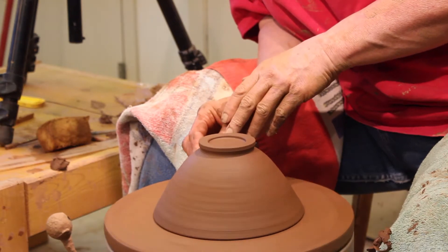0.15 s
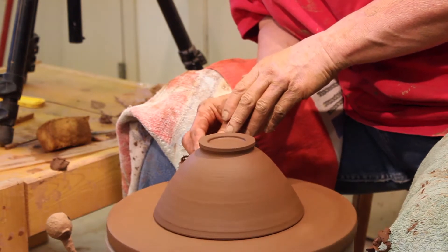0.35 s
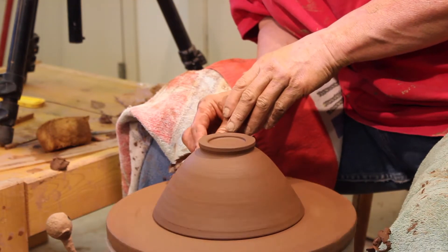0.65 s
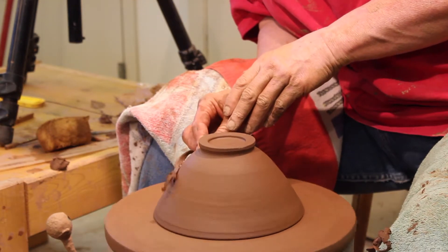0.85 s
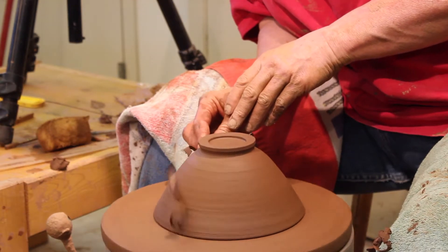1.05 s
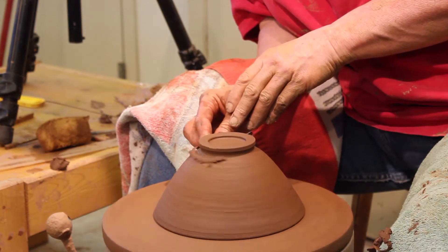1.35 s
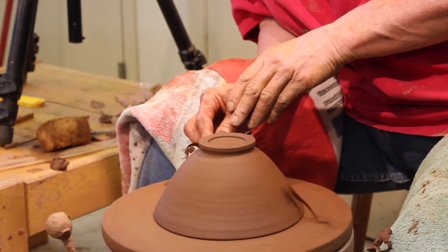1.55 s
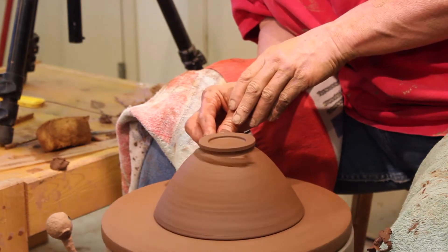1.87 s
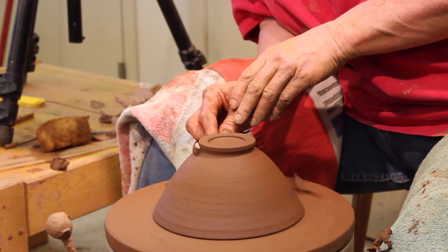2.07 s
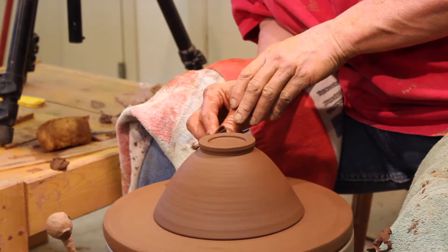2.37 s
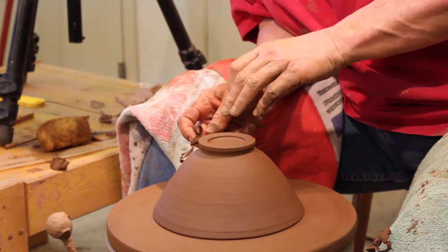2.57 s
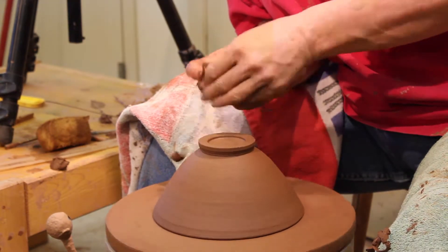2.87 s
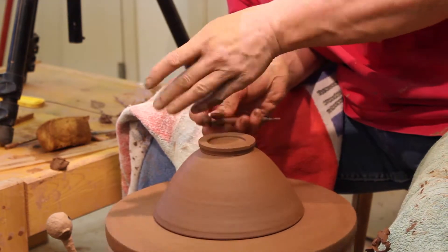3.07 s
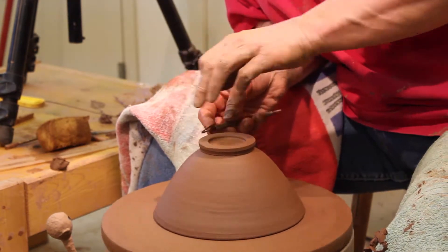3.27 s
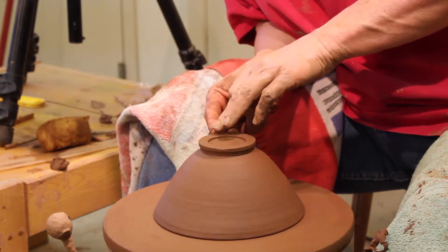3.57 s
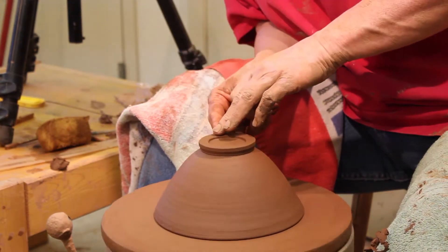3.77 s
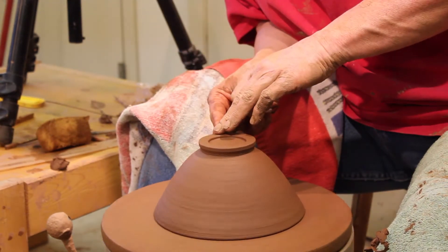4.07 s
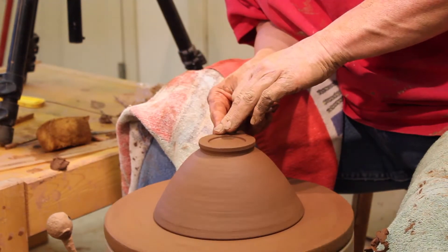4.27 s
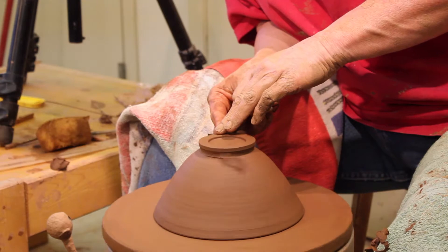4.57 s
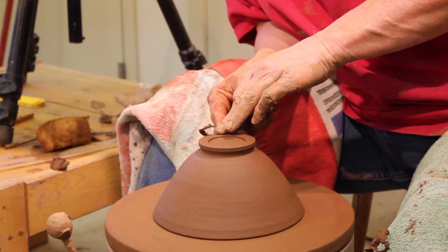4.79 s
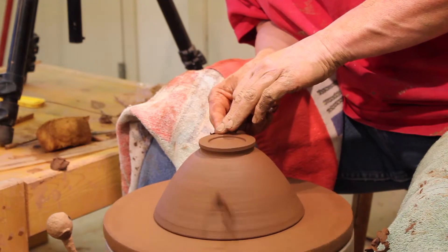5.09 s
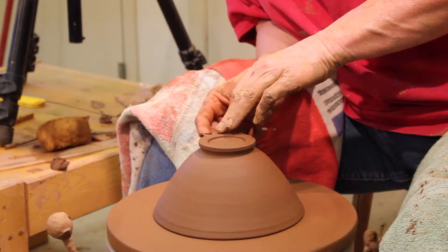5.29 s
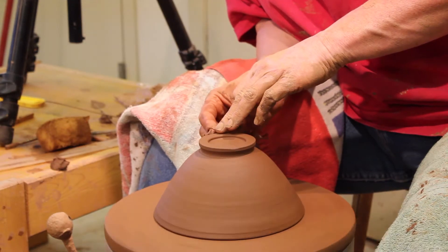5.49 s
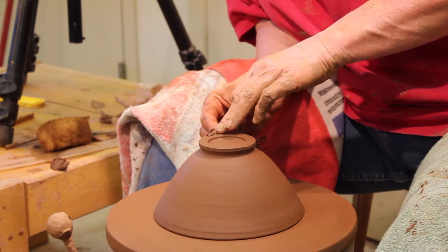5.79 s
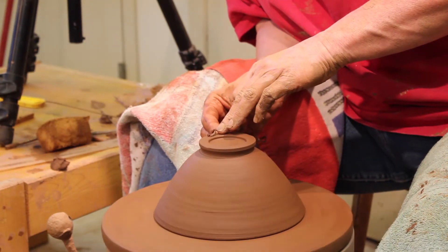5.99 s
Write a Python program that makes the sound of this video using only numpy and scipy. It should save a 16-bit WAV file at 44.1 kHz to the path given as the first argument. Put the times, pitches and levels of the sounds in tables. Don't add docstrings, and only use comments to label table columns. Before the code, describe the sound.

Steady low motor hum with a hollow knock recurring about every two-thirds second, soft clay-shaving hiss fading early, and a few tiny crumb clicks.

```python
import sys
import numpy as np
from scipy import signal
from scipy.fft import rfft, irfft, next_fast_len
from scipy.io import wavfile

SR = 44100
rng = np.random.default_rng(int(sys.argv[2]) if len(sys.argv) > 2 else 0)


def master_out(mix):
    frames = np.transpose(np.atleast_2d(mix))
    ceiling = np.clip(frames, -1, 1)
    pcm = np.round(ceiling * 32767).astype(np.int16)
    wavfile.write(sys.argv[1], SR, pcm)


def linear_from_db(decibels):
    return 10 ** (np.asarray(decibels, float) / 20)


N = 270774
T = np.arange(N) / SR

SHAFT_HZ, LAP_S = 15.405, .6815
SEAM_S = .593

# [multiple, rms level/dB]
SHAFT_ORDERS = [(4, -65), (5, -61), (6, -68), (7, -76), (8, -61), (13, -69), (16, -67), (17, -66),
                (18, -71), (19, -66), (20, -64), (21, -63), (22, -71), (23, -69), (24, -68), (44, -60),
                (55, -68), (57, -62), (58, -63), (84, -72), (91, -74), (107, -75), (109, -76)]
# [multiple, shaft level/dB, idler level/dB, cancellation t/s]
IDLER_BEATS = [(9, -47.9, -51.0, 3.84), (11, -60.5, -53.5, 3.98), (12, -52.4, -57.5, 3.6),
               (14, -66, -68, 5.3)]
# [f/Hz, rms level/dB]
FIXED_TONES = [(55.0, -66), (58.1, -62.5), (120.0, -50.5), (360.0, -73), (443.0, -62), (1970.0, -83)]
# [t/s, peak level/dB]
BELT_FLAWS = [(.013, -36), (.025, -34), (.056, -38), (.072, -36.5), (.086, -36), (.1, -37), (.117, -35.5),
              (.153, -35), (.213, -34), (.235, -35), (.252, -36), (.29, -33), (.317, -36.5), (.389, -36),
              (.405, -36), (.442, -35), (.504, -34), (.565, -38), (.593, -28.5), (.61, -37), (.673, -37)]
# [f/Hz, level/dB per Hz]
FRAME_SPECTRUM = [(400, -84), (432, -78), (480, -68.5), (540, -63.5), (600, -69), (640, -71), (750, -70),
                  (820, -73.5), (940, -79), (1000, -81.5), (1380, -86.5), (1450, -89.5), (1680, -92),
                  (1800, -102)]
# [f/Hz, width/Hz, rms level/dB]
HOUSING_MODES = [(543.7, 27.6, -54.5), (498.9, 19.7, -58), (607.4, 15.5, -58), (637, 8.2, -60.5),
                 (699.5, 22, -61.5), (749.8, 38, -64), (1183.6, 22, -72), (1596, 76, -73),
                 (2030, 45, -87.5), (2490, 30, -83), (2586, 95, -77), (2790, 45, -83.5), (3040, 40, -94),
                 (3790, 25, -95), (3964, 43, -94), (3930, 63, -83), (4010, 26, -90)]
# [t/s, level/dB]
UNLOADED_GAIN = [
    (0, 2.5),
    (1.0, 2.5),
    (2.3, 2),
    (2.9, 2.5),
    (3.1, 6),
    (3.9, 2),
    (4.3, 4.5),
    (5.2, 4),
    (6.14, 1.5),
]
# [t/s, level/dB]
BLADE_PRESSURE = [
    (0, -66),
    (.62, -66),
    (.9, -69.5),
    (1.9, -73),
    (2.5, -80),
    (3.4, -77),
    (4.0, -80),
    (4.6, -75),
    (5.1, -80),
    (6.14, -77),
]
# [t/s, peak level/dB, f/Hz, 60 dB decay t/s]
CRUMB_SNAPS = [
    (2.1435, -57, 4800, .006),
    (2.1435, -52, 5900, .008),
    (2.7541, -46, 3300, .017),
]
# [f/Hz, level/dB per Hz]
RUMBLE_SPECTRUM = [(12, -81), (30, -74), (60, -83.5), (85, -83), (105, -86), (140, -70), (160, -78),
                   (200, -77.5), (230, -75), (280, -81), (380, -80), (410, -85.5), (460, -100)]
# [f/Hz, level/dB per Hz]
HISS_SPECTRUM = [(1200, -108), (1800, -99), (2050, -98), (2350, -100), (3000, -99.5), (3600, -101),
                 (4400, -104), (6500, -106), (10000, -108), (13000, -110), (16500, -113)]


def rms_one(x):
    return x / np.sqrt(np.mean(x ** 2) + 1e-20)


def in_time(rows):
    s, level_db = np.transpose(rows)
    return np.interp(T, s, level_db)


def drift(rate_hz):
    r = np.exp(-80 * np.pi * rate_hz / SR)
    white = rng.standard_normal(N // 40 + 4002)
    slow = signal.lfilter([1], [1, -2 * r, r * r], white)[4000:]
    slow = rms_one(slow - slow.mean())
    return np.interp(np.arange(N) / 40, np.arange(len(slow)), slow)


def colour(white, spectrum):
    size = next_fast_len(N)
    hz = np.maximum(np.arange(size // 2 + 1) * SR / size, 1)
    at_hz, level_db = np.transpose(spectrum)
    gain = linear_from_db(np.interp(np.log(hz), np.log(at_hz), level_db, left=-200, right=-200))
    return irfft(rfft(white, size) * gain, size)[:N] * np.sqrt(SR / 2)


def resonate(x, hz, width):
    r = np.exp(-np.pi * width / SR)
    zeros = np.array([1, 0, -1]) * (1 - r * r) / 2
    poles = [1, -2 * r * np.cos(2 * np.pi * hz / SR), r * r]
    return signal.lfilter(zeros, poles, x)


def looped(period_s, renew):
    size = round(period_s * SR)
    renew = np.clip(renew, .01, 1)
    laps = rng.standard_normal((N // size + 40, size))
    keep = np.sqrt(1 - renew)
    laps = signal.lfilter([np.sqrt(renew)], [1, -keep], laps, axis=0)
    return laps[39:].ravel()[:N]


def motor():
    turn = 2 * np.pi * np.cumsum(1 + .0006 * drift(1.5)) / SR
    out = 0
    for multiple, level_db in SHAFT_ORDERS:
        gain = linear_from_db(level_db - 1.0 + 2.0 * drift(1.3))
        out = out + gain * np.sin(multiple * SHAFT_HZ * turn + 2 * np.pi * rng.random())
    idler_gain_hz = .0505
    for multiple, shaft_db, idler_db, null_s in IDLER_BEATS:
        angle = multiple * SHAFT_HZ * turn + 2 * np.pi * rng.random()
        ahead = 2 * np.pi * multiple * idler_gain_hz * (T - null_s)
        pair = linear_from_db(shaft_db) * np.sin(angle) - linear_from_db(idler_db) * np.sin(angle + ahead)
        out = out + linear_from_db(0.56 * drift(4.6)) * pair
    for hz, level_db in FIXED_TONES:
        out = out + linear_from_db(level_db) * np.sin(2 * np.pi * (hz * T + rng.random()))
    return np.sqrt(2) * out


def belt():
    drum_hz, spread_hz, rise_s = 563, 14, .0046
    out = np.zeros(N + 2 * SR)
    t = np.arange(round(.05 * SR)) / SR
    swell = (t / rise_s * np.exp(1 - t / rise_s)) ** 2
    flaws = rng.standard_normal((len(BELT_FLAWS), 2))
    laps = rng.standard_normal((len(BELT_FLAWS), 10, 2))
    for (s, peak_db), (detune, phase), lap in zip(BELT_FLAWS, flaws, laps):
        hz = drum_hz + spread_hz * detune
        spread_db = .8 if s == SEAM_S else 1.0
        for k, (strength, slip) in enumerate(lap):
            i = round((s - rise_s + k * LAP_S) * SR)
            gain = linear_from_db(peak_db - 3.0 + spread_db * strength)
            out[i:i + len(t)] += gain * swell * np.sin(2 * np.pi * (hz * t + phase) + 0.94 * slip)
    return out[:N]


def slack():
    away = (T - SEAM_S + .004 + LAP_S / 2) % LAP_S - LAP_S / 2
    return 1 - .7 * np.exp(-(away / .014) ** 2)


def frame():
    split_hz = 820
    ease = slack()
    lap = ease * looped(LAP_S, renew=.7)
    worn = .25
    shaft = np.sqrt(worn) * looped(1 / SHAFT_HZ, renew=.04) + np.sqrt(1 - worn) * rng.standard_normal(N)
    low = signal.butter(2, split_hz, fs=SR, output="sos")
    high = signal.butter(2, split_hz, "high", fs=SR, output="sos")
    rough = signal.sosfiltfilt(low, lap) + signal.sosfiltfilt(high, shaft)
    out = colour(rough, FRAME_SPECTRUM) * linear_from_db(0.49 * drift(0.66))
    brushes = looped(1 / SHAFT_HZ, renew=0.61)
    free_db = in_time(UNLOADED_GAIN)
    for hz, width, level_db in HOUSING_MODES:
        ring = rms_one(resonate(resonate(brushes, hz, width), hz, width))
        gain = linear_from_db(level_db + free_db + 1.0 * drift(1.2))
        out = out + gain * ring * (ease if hz < split_hz else 1)
    return out


def trimming():
    wobble_db = 1.5 * np.cos(2 * np.pi * 4.8 * T) * np.exp(-(T / .9) ** 2)
    hiss_db = in_time(BLADE_PRESSURE) + wobble_db
    bite_db, hold_s, fade_db_per_s, rest_db = -61, .24, 19, -74
    fade_db = fade_db_per_s * np.maximum(T - hold_s, 0)
    ring_db = np.maximum(bite_db - fade_db + wobble_db, rest_db)
    grit = rng.standard_normal((2, N)) * linear_from_db(1.2 * drift(30))
    ring = rms_one(resonate(resonate(grit[0], 2800, 1100), 2800, 1100))
    shaving = rms_one(resonate(resonate(grit[1], 5720, 1400), 5720, 1400))
    finest = rms_one(resonate(grit[0], 6600, 3200))
    out = linear_from_db(ring_db - 4.5) * ring + linear_from_db(hiss_db - 2.4) * shaving + linear_from_db(hiss_db - 8.0) * finest
    for s, peak_db, hz, t60 in CRUMB_SNAPS:
        age = np.maximum(T - s, 0)
        bent_age = age - .00007 * (1 - np.exp(-age / .0006))
        out = out + linear_from_db(peak_db - 60 * age / t60) * np.sin(2 * np.pi * hz * bent_age)
    return out


def room():
    rumble = colour(rng.standard_normal(N), RUMBLE_SPECTRUM)
    hiss = colour(rng.standard_normal(N), HISS_SPECTRUM)
    return rumble + hiss * linear_from_db(0.32 * drift(1.3))


def scene():
    return (motor() + belt() + frame() + trimming() + room())[None]


def band_limit(x):
    return signal.sosfilt(signal.butter(12, 15840, fs=SR, output="sos"), x)


def record(dry):
    return band_limit(dry)


dry = scene()
out = record(dry)
master_out(out)
```